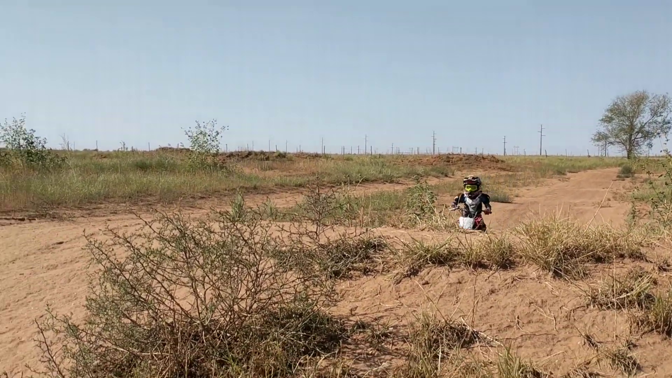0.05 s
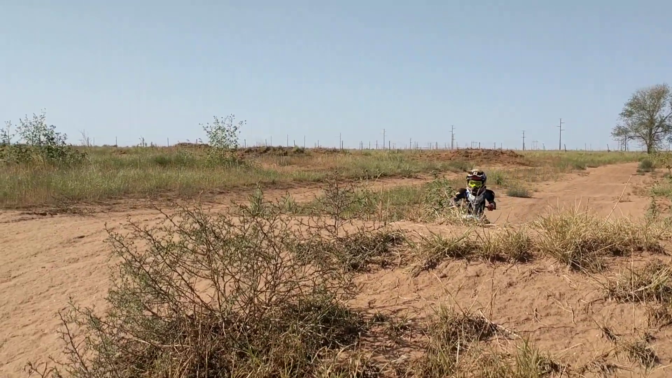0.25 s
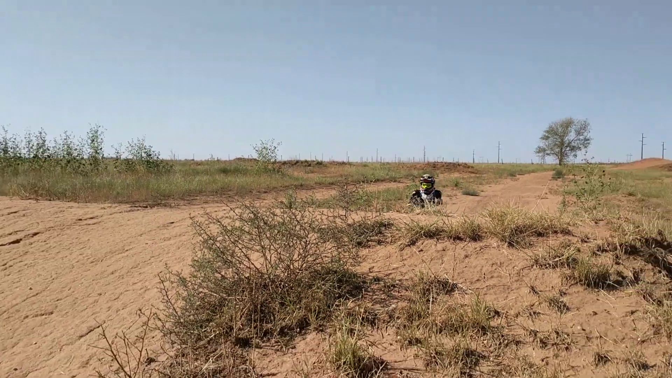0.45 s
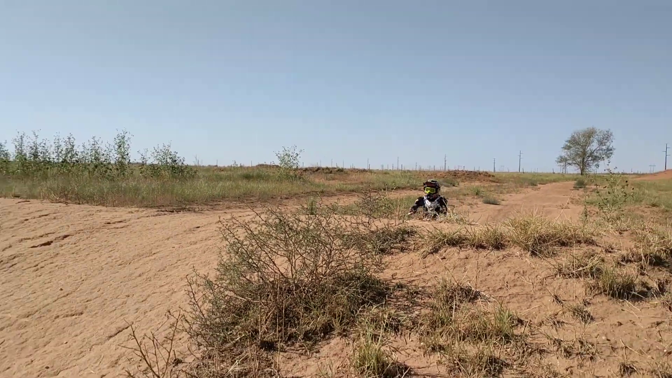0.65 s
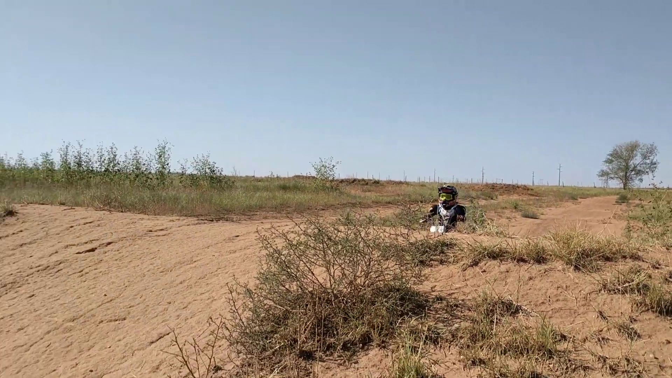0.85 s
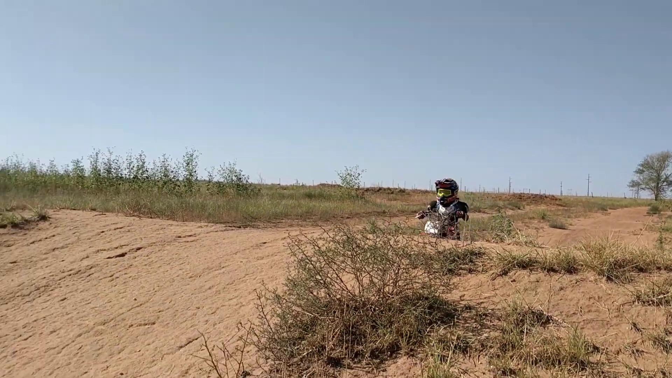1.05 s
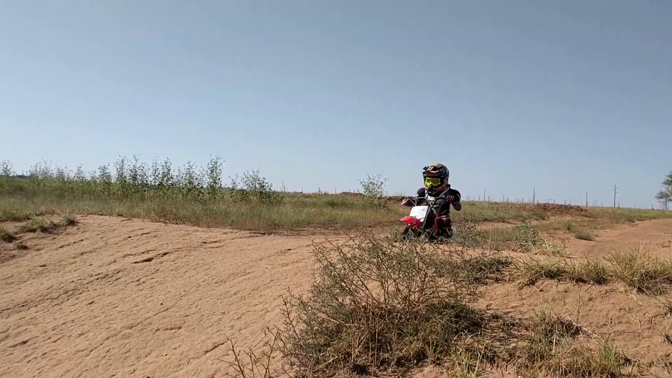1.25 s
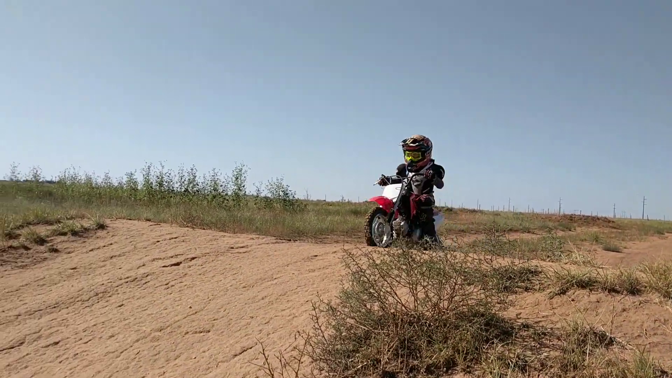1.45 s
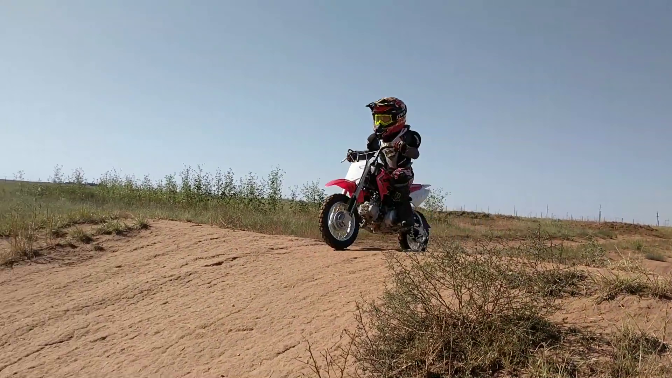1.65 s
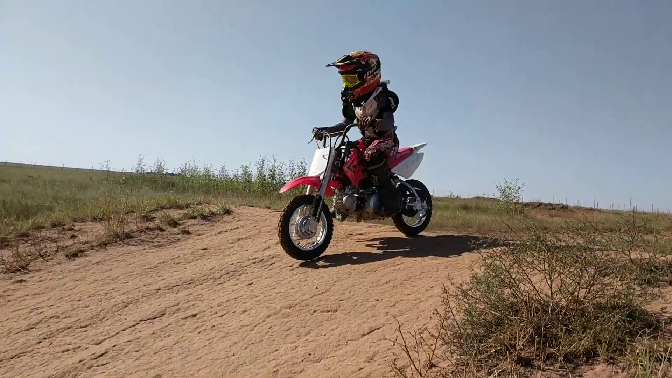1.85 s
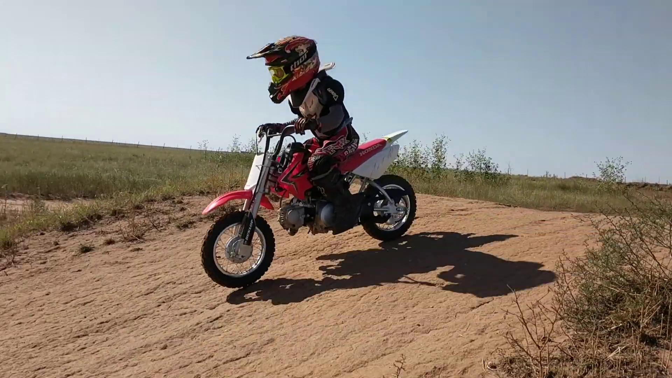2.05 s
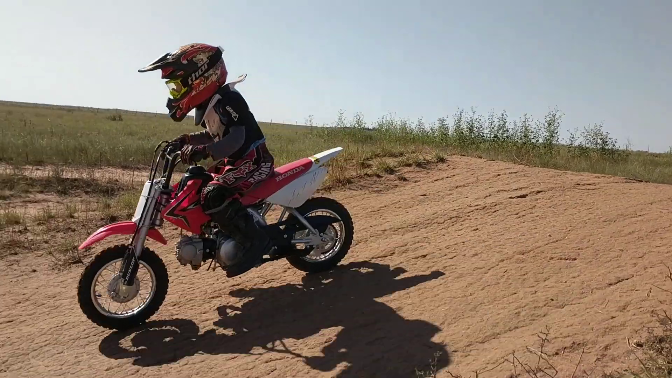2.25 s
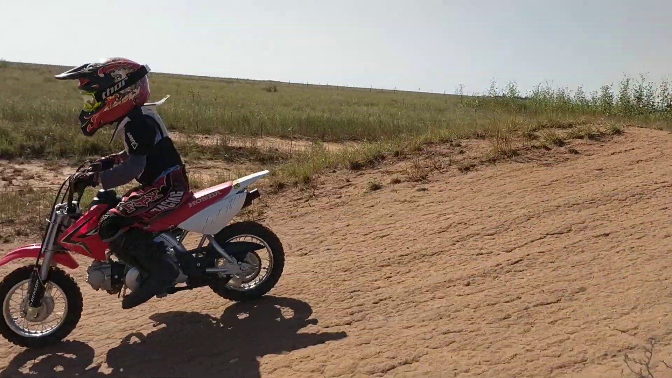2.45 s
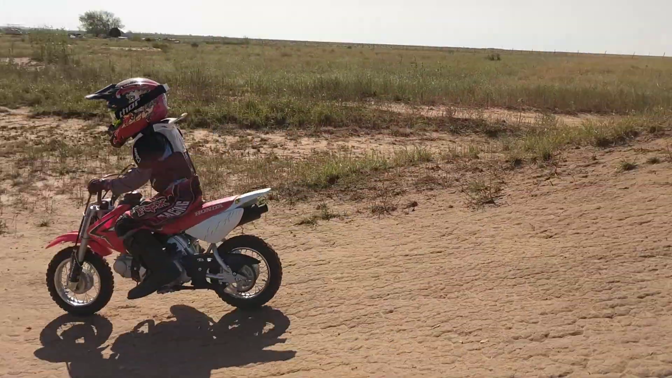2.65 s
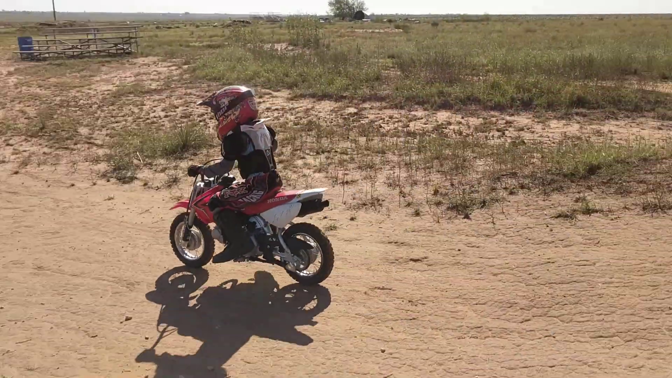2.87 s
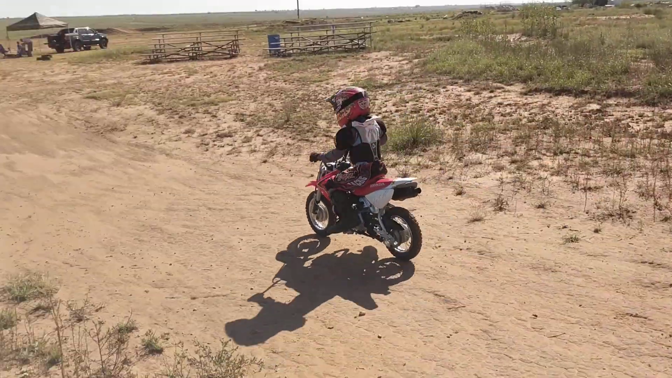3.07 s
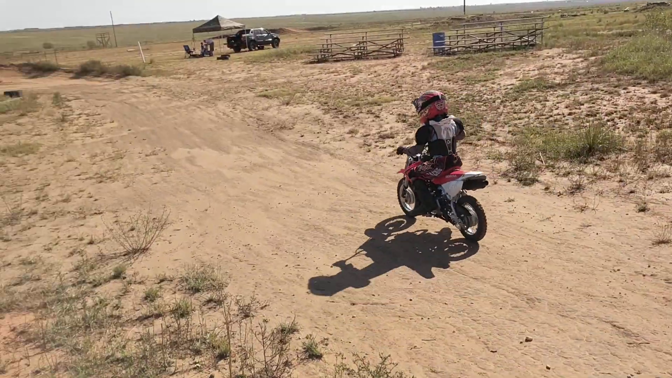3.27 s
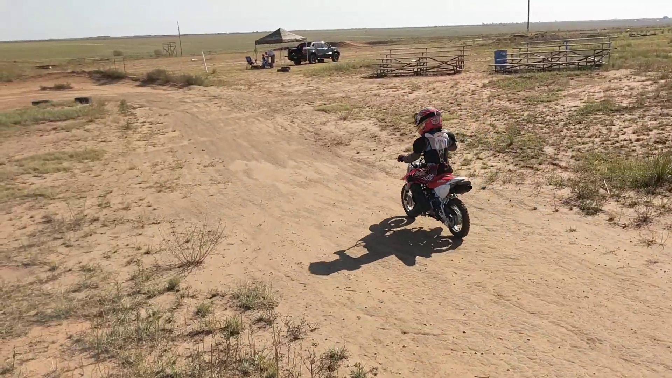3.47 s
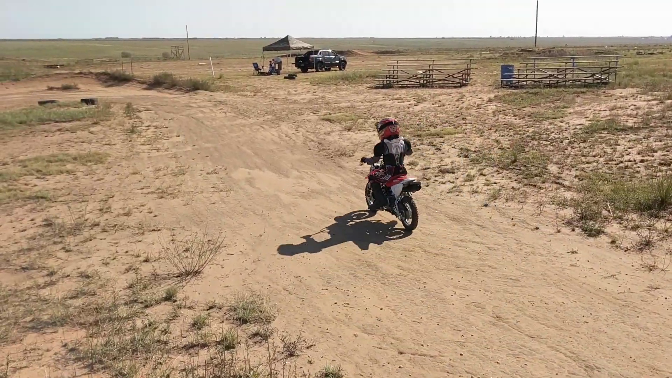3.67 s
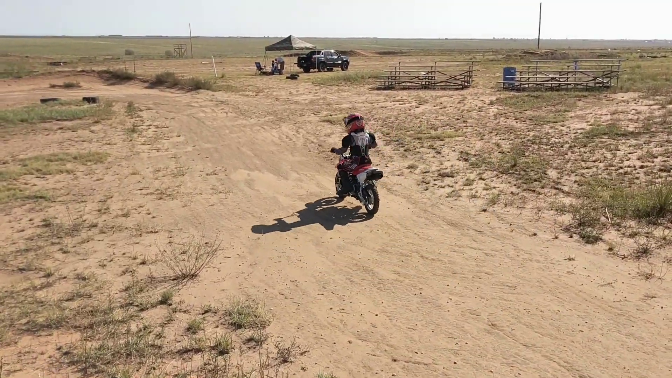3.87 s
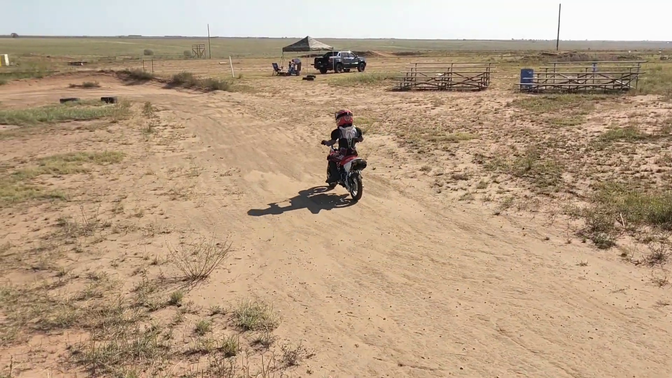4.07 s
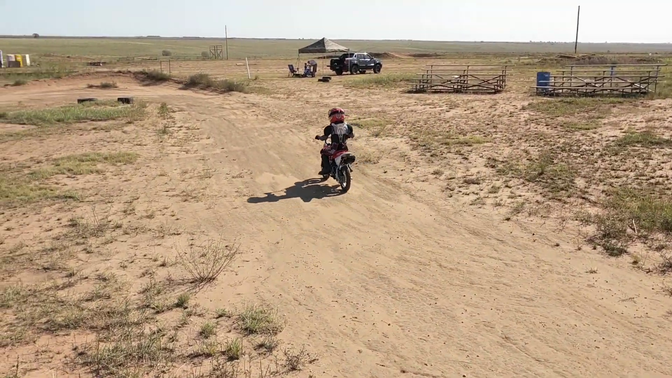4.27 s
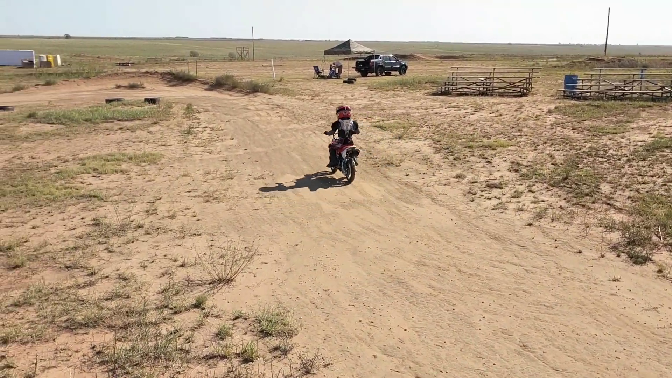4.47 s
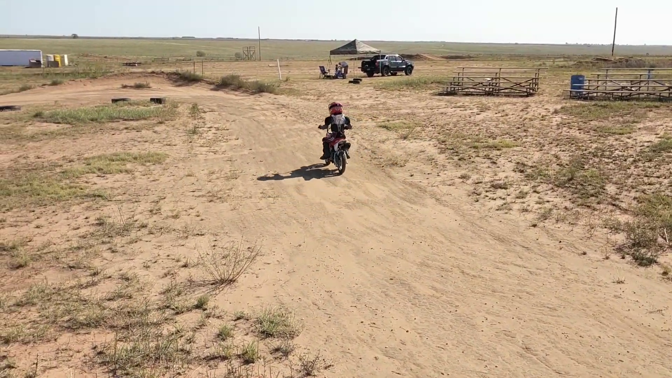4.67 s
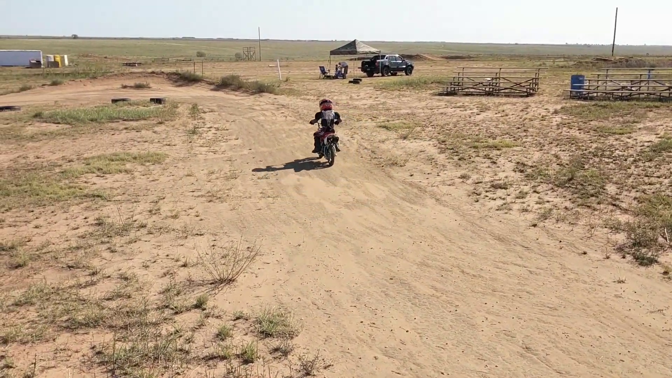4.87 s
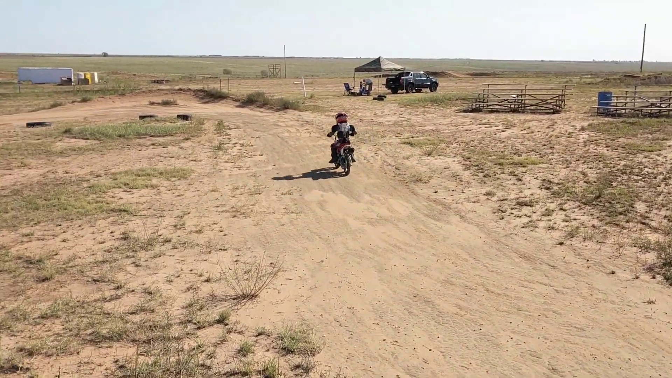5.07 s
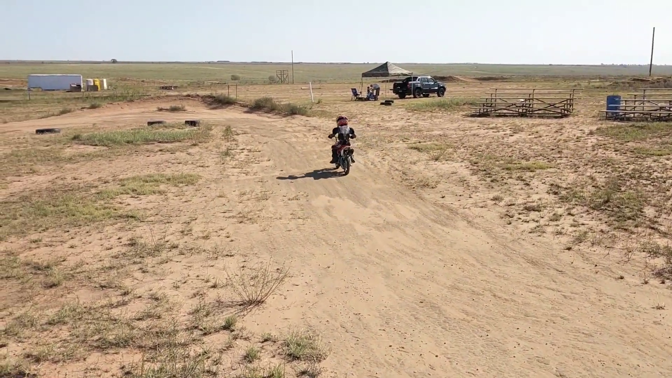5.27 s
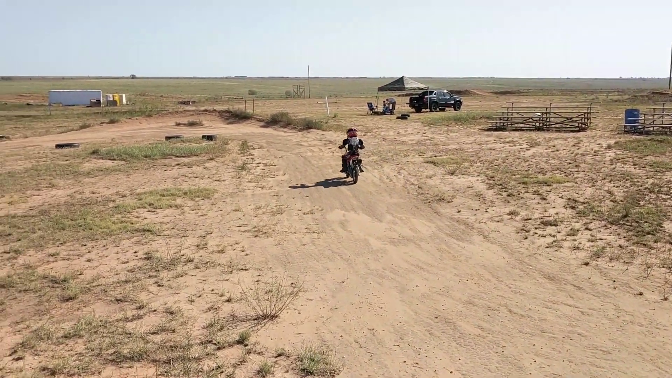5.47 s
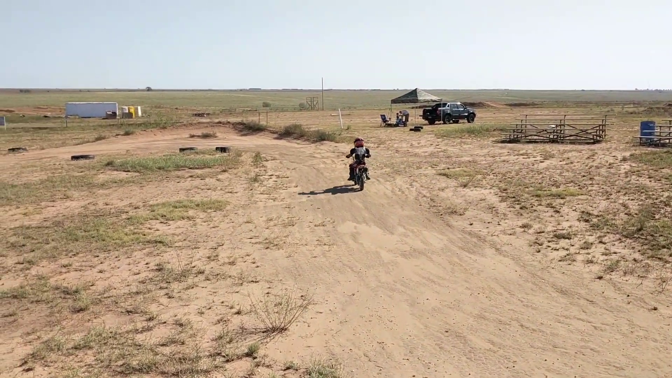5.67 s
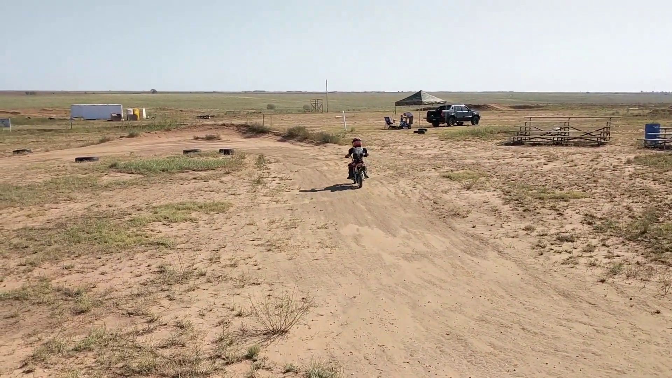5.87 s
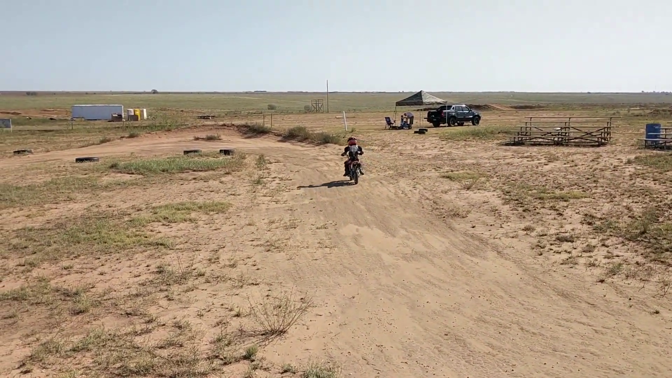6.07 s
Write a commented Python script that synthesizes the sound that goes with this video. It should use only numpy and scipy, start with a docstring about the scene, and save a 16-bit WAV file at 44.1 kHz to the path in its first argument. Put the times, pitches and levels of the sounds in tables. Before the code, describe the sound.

A small single-cylinder dirt bike putters toward the microphone in open country with no echo, under a low wind rumble. It revs briefly from about 0.1 to 0.6 seconds, eases, then pulls again from 1.1 to 2.3 seconds with a sharp, pulsing bark that grows louder. Engine clatter, gear whine, a few thin squeaks and the gritty hiss of tyres on dirt come up as it nears. The bike is loudest around 2 to 2.5 seconds, passing close as the throttle shuts. It coasts away with a softer, low putter that slows and fades, with irregular light metallic knocks from 3.5 to 5.3 seconds. A short, more distant throttle blip with bright ticks follows from 5.3 to 5.6 seconds. From about 3.3 seconds the wind buffets the microphone harder, with gusts and low pops until the end at about 6 seconds.

```python
"""Dirt bike passing in wind

A small single-cylinder four-stroke comes over a mound, passes close and rolls away on a dirt track.
Gas pulses ring the silencer: a sharp bark on open throttle, a soft boom on shut throttle.
The piston knocks the casing every cycle, valves clatter, gears whine and tyres hiss on the dirt.
Wind buffets the microphone, harder as the bike leaves."""
import sys
import numpy as np
from scipy import signal
from scipy.fft import rfft, irfft, next_fast_len
from scipy.io import wavfile
from scipy.ndimage import uniform_filter1d, map_coordinates

SR = 44100
rng = np.random.default_rng(int(sys.argv[2]) if len(sys.argv) > 2 else 0)


def unload_audio(sound):
    """Save the sound as a 16-bit wav file, at the path given as the first command line argument."""
    columns = np.transpose(np.atleast_2d(sound))
    # keep every value between -1 and 1, then stretch to whole-number steps
    steps = np.round(np.clip(columns, -1, 1) * 32767)
    wavfile.write(sys.argv[1], SR, steps.astype(np.int16))


N = 269875
T = np.arange(N) / SR

# Engine speed: t/s, firing rate/Hz
ENGINE_SPEED = [(0.0, 46.7), (0.24, 47.07), (0.37, 50.45), (0.54, 48.56), (0.66, 46.79), (0.8, 44.97),
                (1.0, 43.1), (1.25, 43.74), (1.33, 41.09), (1.52, 39.27), (1.72, 38.65), (1.87, 36.77),
                (2.2, 42.24), (2.33, 41.02), (2.46, 43.76), (2.8, 45.3), (3.3, 41.99), (3.87, 38.18),
                (4.3, 31.17), (4.93, 29.49), (5.16, 27.95), (5.5, 33.0), (5.7, 30.64), (6.12, 29.71)]
def engine_cycle():
    """Firing rate in Hz and running phase in cycles."""
    rate_hz = curves(ENGINE_SPEED)[0]
    return rate_hz, .71 + np.cumsum(rate_hz) / SR


# Throttle twists: opens/s, shuts/s, rise/s, fall/s, boom/dB, bark/dB, edge/dB
TWISTS = [(0.124, 0.587, 0.13, 0.098, -25.5, -28.5, -1.5), (1.077, 2.273, 0.34, 0.68, -22, -31, 2.5),
          (5.287, 5.62, 0.087, 0.045, -18, -32, -19)]
def firings():
    """Firing times in s, one per cycle, and the throttle (0 shut, 1 open)."""
    _, cycles = engine_cycle()
    times = np.interp(np.arange(1, int(cycles[-1]) + 1), cycles, T)
    held = sum(1.0 * ((T > opens) & (T < shuts)) for opens, shuts, *_ in TWISTS)
    return times, uniform_filter1d(held, size=600)


def load():
    """Boom, bark and edge in dB: each twist rises, holds, eases, then floats, neither pushing nor sucking."""
    float_s, float_db = 0.046, 7.5
    rows = []
    for opens, shuts, rise, fall, *full_db in TWISTS:
        eased_db = np.subtract(full_db, [3.5, 4, 22.5])
        floating_db = eased_db - [float_db, float_db, 0]
        rows += [(opens, *eased_db), (opens + rise, *full_db), (shuts - fall, *full_db),
                 (shuts - float_s, *eased_db), (shuts, *floating_db)]
    return curves(sorted(rows))


def silencer(kicks, share, spectrum, band):
    """One band of the silencer rung by gas pulses; rms 1 at full share."""
    full_rms = np.std(filtered(ring(kicks, spectrum), band))
    return filtered(ring(kicks * share, spectrum), band) / full_rms


# Pulse spectra (loaded, coasting, leaking forward with a hollow pipe note): f/Hz, level/dB
LOADED_SPECTRUM = [(30, -35.5), (78, -5.5), (115, -7), (155, -6.5), (192, 5.5), (240, -12.5), (340, -2),
                   (440, -4), (500, -14.5), (615, -2.5), (690, -13), (760, -9), (850, -18.5), (1060, -14),
                   (1280, -34), (1450, -14.5), (1700, -36), (2050, -23.5), (2800, -54.5), (6000, -108)]
COAST_SPECTRUM = [(30, -39.5), (88, -29), (132, 2.5), (172, 6.5), (220, -9), (300, -15), (375, -13.5),
                  (450, -29.5), (560, -38), (720, -43.5), (900, -55.5), (2000, -93.5)]
LEAK_SPECTRUM = [(30, -36), (200, -5), (340, -3), (430, -9.5), (510, -6.5), (578, -1), (640, -14.5),
                 (750, -6.5), (850, -23.5), (1060, -19.5), (1250, -22.5), (1450, -22), (1900, -28),
                 (3000, -75), (6000, -108)]
# Stumbles: t/s, length/s, gain/dB
WEAK_FIRINGS = [(0.18, .03, -9), (0.845, .03, -8), (0.942, .036, -11), (1.19, .03, -8)]
def exhaust(times, throttle):
    """Gas pulses ring the silencer: a steep push under load, a round suck when coasting."""
    near_db, heading = ride()
    boom_db, bark_db, edge_db = load()
    shut = 1 - throttle
    bass, treble = lowpass(244, 8), highpass(244, 8)
    vigour = amp(swells(WEAK_FIRINGS))
    sucks = -vigour * beats(times - .0013, scatter_db=1.1, jitter_s=.00013)
    pushes = vigour * beats(times - .0003, scatter_db=.8, jitter_s=.00002)
    starved = vigour * beats(times - .0003, scatter_db=3, jitter_s=.0001)

    overrun_db = 6 * sum((T > shuts) * np.exp(-np.abs(T - shuts) / 0.024) for _, shuts, *_ in TWISTS)
    boom = amp(-21.5 + overrun_db) * silencer(sucks, shut, COAST_SPECTRUM, bass)
    boom += amp(boom_db) * silencer(pushes, throttle, LOADED_SPECTRUM, bass)

    leak = 0.084 + 0.29 * np.maximum(heading, 0)
    putter = silencer(sucks, shut, COAST_SPECTRUM, treble)
    putter += silencer(starved, leak * shut, LEAK_SPECTRUM, treble)

    hot = 1.0 * (engine_cycle()[0] > 41.5)  # hotter gas at speed rings higher
    hot_spectrum = [(hz * 1.057, db) for hz, db in LOADED_SPECTRUM]
    bark = silencer(pushes, throttle * (1 - hot), LOADED_SPECTRUM, treble)
    bark += silencer(pushes, throttle * hot, hot_spectrum, treble)
    bark += amp(-1.5) * gas_rush(pushes * throttle)
    bark += (amp(edge_db) - 1) * filtered(bark, highpass(740, 8))  # more load, steeper pulse
    return amp(near_db) * (boom + amp(bark_db) * bark + amp(-35.5 + 6.5 * heading) * putter)


def gas_rush(pushes):
    """Gas rushes out behind each loaded pulse."""
    spectrum = colour([(300, -1), (700, 2.5), (1150, -1.0), (2500, -10.5), (4000, -24), (16000, -57)])
    return filtered(noise() * bursts(pushes, attack_s=0.00062, decay_s=0.025), spectrum)


def ride():
    """Spreading loss in dB (0 when closest) and heading (1 coming, -1 leaving)."""
    pass_s, speed_m_per_s, closest_m = 2.506, 3.38, 2.354
    to_go_m = speed_m_per_s * (pass_s - T)
    distance_m = np.hypot(to_go_m, closest_m)
    return 20 * np.log10(closest_m / distance_m), to_go_m / distance_m


def engine_hidden():
    """1 while the mound screens the engine, then 0."""
    return 1.0 * (T <= 1.23)


def mechanics(times, throttle):
    """Piston and valves strike once a cycle over the whirr of the drive; under load they trail the bark."""
    _, heading = ride()
    whirr = amp(2.5 + 4.5 * heading - 3 * np.maximum(-heading, 0))
    hits_s = times - .0017 + 0.00442 * np.interp(times, T, throttle)
    return piston_slap(hits_s, throttle, whirr) + valve_clatter(hits_s, whirr)


# Casing modes, coasting and loaded: f/Hz, width/Hz, level/dB
CASING_MODES = [(1327, 100, -12), (1512, 88, 7.5), (1587, 130, -1), (2110, 180, -19), (2500, 160, -14),
                (3120, 68, -28)]
LOADED_MODES = [(1420, 91, 6.5), (1560, 185, 2.5), (1970, 430, -7.5), (2540, 150, -8.5), (3170, 240, -13.5)]
# Casing ring: t/s, level/dB
SLAP_LEVEL = [(0.0, -53), (0.34, -59), (0.71, -56.5), (1.05, -49), (1.09, -57), (1.28, -50.5),
              (1.45, -49.5), (1.66, -39), (1.8, -43.5), (2.0, -42), (2.14, -33.5), (2.28, -50),
              (2.37, -36.5), (3.0, -45.5), (3.83, -40.5), (4.14, -53), (4.5, -58.5), (5.45, -71),
              (6.12, -64)]
# Random drift of that level: firing rate/Hz, signed depth/dB
SLAP_DRIFT = [(30, -2), (40, 1.87)]
def piston_slap(hits_s, throttle, whirr):
    """The piston rings the casing cleanly; loose parts chatter after it."""
    def casing(force):
        return levelled(shaken(force * (1 - throttle), CASING_MODES) + shaken(force * throttle, LOADED_MODES))

    slaps = beats(hits_s + 0.00056, scatter_db=1.5, jitter_s=0.00014)
    chatter = noise() * (bursts(slaps, attack_s=0.0043, decay_s=0.0028) + 0.17 * whirr)
    knock = levelled(casing(slaps) + (.4 + .4 * whirr) * casing(chatter))
    drift_db = np.interp(engine_cycle()[0], *np.transpose(SLAP_DRIFT)) * wobble(11)
    return amp(curves(SLAP_LEVEL)[0] + drift_db) * knock


# Valve noise: f/Hz, level/dB
VALVE_SPECTRUM = [(300, 9.5), (600, -3), (850, -5), (1150, 3), (1850, 2.5), (2400, -0.5), (2800, 0.5),
                  (3200, -2.5), (3700, -7), (4300, -12.5), (6000, -8), (7200, -16), (8200, -10.5),
                  (11000, -18.5), (17000, -67)]
def valve_clatter(hits_s, whirr):
    """Valve taps are short noise bursts over the steady whirr of chain and gears."""
    near_db, _ = ride()
    taps = beats(hits_s, scatter_db=5.5, jitter_s=0.00031)
    envelope = bursts(taps, attack_s=0.0014, decay_s=0.0035) + whirr
    clatter = levelled(filtered(noise() * envelope, colour(VALVE_SPECTRUM)))
    lash_db = 4 * swell(2.32, 0.06)  # the slack chain rattles once, on a throttle snap
    return amp(-38.5 + 1.4 * near_db - 6 * engine_hidden() + lash_db) * clatter


# Hard knocks: t/s, ping/dB, clank/dB
HARD_KNOCKS = [(3.544, -27, -42), (3.569, -35, -38), (3.72, -40, -51), (3.768, -29, -64), (3.824, -34, -53),
               (3.849, -33, -52), (3.874, -29, -41), (3.984, -34, -41.5), (4.124, -35, -49),
               (4.339, -34, -60), (4.371, -33, -45), (4.403, -38, -49), (4.437, -35, -53),
               (4.501, -33.5, -61), (4.569, -39, -63), (4.668, -34, -58), (4.701, -37, -55),
               (4.769, -36, -62), (4.902, -37, -52), (4.938, -38, -51), (5.006, -40.5, -54),
               (5.075, -44, -55), (5.11, -40, -45), (5.142, -40, -52), (5.179, -42, -46),
               (5.251, -36.5, -47.5), (5.793, -59, -49), (5.892, -55, -50.5), (5.926, -55, -53.5),
               (5.991, -52.5, -48)]
# Clank of loose parts: f/Hz, width/Hz, level/dB
CLANK_MODES = [(1740, 120, 6.5), (2406, 220, 11.5), (2690, 180, 9), (3850, 250, -1), (4400, 360, -3)]
def knocks():
    """As the engine slows, single cycles knock hard: a casing ping and a soft clank of loose parts."""
    times, _, clank_db = np.transpose(HARD_KNOCKS)
    rattle = bursts(impulses(times, amp(clank_db)), attack_s=0.00099, decay_s=0.0042)
    clank = struck(rattle, lambda hz: resonances(CLANK_MODES)(hz) * lowpass(5500, 4)(hz))
    return clank + sum(blow(at + 0.00104, db, CASING_MODES, attack_s=0.0017) for at, db, _ in HARD_KNOCKS)


# Ticks under load at low speed: t/s, relative crack/dB, ping/Hz, relative clank/dB
LOAD_TICKS = [(5.281, -37, 9600, -45), (5.3153, -28.5, 8100, -39), (5.349, -30.5, 8200, -32),
              (5.381, -28, 8300, -30.5), (5.4122, -26, 9600, -34), (5.4424, -23, 9530, -31.5),
              (5.4722, -30.5, 8140, -34.5), (5.5034, -24.5, 10100, -30.5), (5.535, -29, 10000, -32),
              (5.566, -38, 10400, -35.5), (5.598, -43, 8350, -51)]
# The crack, and the clear note in the clank: f/Hz, width/Hz, level/dB
CRACK_MODES = [(8400, 600, 2), (9950, 810, 2), (13400, 1500, 1)]
NOTE_MODES = [(2870, 90, -4), (1646, 110, -4.5), (4800, 220, -8)]
# Trailing rasp: f/Hz, level/dB
RASP_SPECTRUM = [(500, -4), (1200, 5), (1800, 5.5), (3000, -1), (3500, -5), (4600, -2), (6500, -12),
                 (8500, -6), (12000, -22), (17000, -31)]
def ticks():
    """Metal ticks: a bright ping and crack, then a lower ringing clank that trails off in a rasp."""
    times, crack_db, _, clank_db = np.transpose(LOAD_TICKS)
    pings = sum(blow(at, db, [(hz, 380, 0), (13350, 460, 1)], attack_s=0.00058)
                for at, db, hz, _ in LOAD_TICKS)
    notes = sum(blow(at + .0006, db, NOTE_MODES, attack_s=.0007) for at, _, _, db in LOAD_TICKS)
    cracks, clanks = impulses(times, amp(crack_db)), impulses(times, amp(clank_db))
    rasp = unit(filtered(noise(), colour(RASP_SPECTRUM))) * bursts(clanks, attack_s=0.001, decay_s=0.018)
    snap = bursts(cracks, attack_s=0.0002, decay_s=0.00096)
    tail = 0.05 * bursts(cracks, attack_s=0.00069, decay_s=0.007)
    crack = struck(snap + tail, resonances(CRACK_MODES))
    clank = struck(bursts(clanks, attack_s=0.0006, decay_s=0.0034), resonances(CLANK_MODES))
    mix = amp(-2) * (pings + notes) + amp(-9.5) * crack + amp(-7) * clank + amp(-17.5) * rasp
    return filtered(mix, lowpass(16000, 24))


# Gear tones: multiple of firing rate, level/dB, side-on gain/dB, rear gain/dB
GEAR_ORDERS = [(16.23, -11.5, 15.5, -8), (30.03, -4.5, 10.5, -1.5), (58, -4, -4, 5.5), (92.5, -12, -12, 10)]
def gear_whine():
    """Gear teeth sing louder with speed and are loaded hardest at each firing."""
    rate_hz, cycles = engine_cycle()
    near_db, heading = ride()
    throb = 1 + 0.41 * np.cos(2 * np.pi * cycles)
    level_db = -48 + 1.51 * near_db + 35 * np.log10(rate_hz / rate_hz.max()) - 7.5 * engine_hidden()
    side_on, behind = swell(3.02, 0.72), np.maximum(-heading, 0)
    tones = sum(amp(db + side_db * side_on + rear_db * behind) * narrowband(order * rate_hz, width_hz=60)
                for order, db, side_db, rear_db in GEAR_ORDERS)
    return amp(level_db) * throb * tones


# Squeaks: centre/s, length/s, f/Hz, level/dB
CHASSIS_SQUEAKS = [(1.52, 0.018, 11100, -51), (1.809, 0.013, 11360, -43.5), (1.88, 0.022, 8250, -54),
                   (2.17, 0.11, 1464, -44), (2.207, 0.11, 3100, -45), (2.206, 0.046, 8670, -48),
                   (2.766, 0.044, 2480, -40), (4.35, 0.37, 8040, -72)]
def squeaks():
    """Chain and chassis squeak thinly over the bumps."""
    return sum(amp(db) * swell(at, length_s) * narrowband(hz, width_hz=8 * np.sqrt(hz))
               for at, length_s, hz, db in CHASSIS_SQUEAKS)


# Chain ring: f/Hz, width/Hz, level/dB
CHAIN_MODES = [(8630, 600, 0), (9600, 920, 0)]
def chain_sizzle():
    """The chain sizzles as it pulls over the mound."""
    sizzle = unit(filtered(noise() * amp(5.3 * wobble(150)), resonances(CHAIN_MODES)))
    return amp(-53) * swell(1.99, 0.89) * sizzle


def timing_chain():
    """The timing chain whirrs in step with the engine, heard from ahead."""
    near_db, heading = ride()
    whirr = narrowband(71 * engine_cycle()[0], width_hz=330)
    return amp(-61.5 + 1.34 * near_db) * np.maximum(heading, 0) * whirr


def grit(count):
    """Each flung grain is a tiny high ping."""
    when, pitch, force = rng.random((count, 3)).T
    t = T[:SR // 80]
    hz, gain = 6500 + 9500 * pitch[:, None], amp(-1.5 + 14 * force[:, None] ** 3)
    pings = gain * np.sin(2 * np.pi * hz * t) * np.exp(-t / 0.0028)
    samples = (when * (N - len(t))).astype(int)[:, None] + np.arange(len(t))
    return np.bincount(samples.ravel(), pings.ravel(), N)


# Crushed dirt: f/Hz, level/dB
DIRT_SPECTRUM = [(1500, -6), (4000, 9), (7000, 5.5), (9500, 4), (12000, 2.5), (14000, 4.5), (17000, 0)]
def tyres():
    """Knobbly tyres crush the dirt: a grainy hiss, its top screened by the mound and from ahead."""
    crunch = noise() * amp(3.8 * wobble(500) + 1.8 * wobble(40))
    hiss = unit(unit(filtered(crunch, colour(DIRT_SPECTRUM))) + grit(count=160))
    screened = filtered(hiss, lowpass(10000, 10))
    near_db, heading = ride()
    hidden = np.interp(T, [1.34, 1.36], [1, 0])
    dull = np.maximum(hidden, 0.6 * heading)
    return amp(-46 + 1.65 * near_db - 19 * hidden) * ((1 - dull) * hiss + dull * screened)


# Breeze: t/s, level/dB
BREEZE_LEVEL = [(0, -30), (1.35, -30.5), (1.55, -39), (2.0, -48), (2.15, -27), (3.3, -26), (4.4, -26),
                (5.5, -25), (6.12, -24.5)]
# Gusts and lulls: centre/s, length/s, gain/dB
GUST_SWELLS = [(0.2, 0.1, 11.5), (0.384, 0.26, 6), (1.004, .08, -7), (1.183, 0.053, 10), (2.513, 0.038, 6),
               (3.372, 0.046, 10.5), (3.737, 0.048, 8), (3.89, 0.031, 4), (4.29, 0.13, -3.5),
               (4.41, 0.018, 6.5), (4.511, 0.021, 7.5), (4.655, 0.17, 3.5), (4.805, 0.058, 2.5),
               (4.908, 0.059, -6.5), (5.296, 0.08, -5), (5.4, 0.042, 4), (5.647, 0.08, 1.5),
               (5.858, .05, 4), (6.008, 0.045, 5)]
# Turbulence: f/Hz, level/dB
RUMBLE_SPECTRUM = [(20, -61), (32, -34), (48, -4), (75, 1.5), (110, 1), (165, -5.5), (230, -11),
                   (330, -22.5), (480, -28.5), (800, -45), (2000, -104)]
def wind():
    """Turbulence rumbles on the microphone; small eddies add flurries that grow with the gusts."""
    gust_db = swells(GUST_SWELLS) + 1.7 * wobble(14)
    rumble = levelled(filtered(noise(), colour(RUMBLE_SPECTRUM)), window=SR // 10)
    deep = filtered(rumble, lowpass(110, 8))
    flurry_db = -4 + 0.36 * gust_db + 5.4 * wobble(30)
    rumble += (amp(flurry_db) - 1) * filtered(rumble, highpass(330, 6))
    exposure = np.interp(T, [3.1, 3.7], [.25, 1])  # fuller as the microphone turns into the wind
    return amp(curves(BREEZE_LEVEL)[0] + gust_db) * (deep + exposure * (rumble - deep))


# Strong eddies: t/s, relative level/dB
EDDIES = [(0.828, -37), (2.554, -42), (3.371, -30.5), (3.49, -46), (3.596, -34.5), (3.745, -49),
          (4.041, -36.5), (4.172, -33), (4.177, -31.5), (4.413, -51), (4.509, -46), (4.779, -28.5),
          (4.801, -31), (4.827, -28.5), (4.833, -34), (5.653, -34), (5.692, -37), (5.924, -38.5),
          (5.969, -32), (6.025, -33.5)]
def wind_pops():
    """An eddy is a brief push of air and a slower suck of equal volume; each sheds three weaker ones."""
    times, db = np.transpose(EDDIES)
    t = T[:SR // 20]
    push, suck = [u ** 2 * np.exp(-u) for u in (t / 0.00041, t / 0.0021)]
    eddy = push - suck * push.sum() / suck.sum()
    delays_s = rng.uniform(0.00097, 0.013, (len(times), 3)).T
    shed = sum(impulses(times + delay, amp(db - 13)) for delay in delays_s)
    pops = amp(16.5) * signal.fftconvolve(impulses(times, amp(db)) + shed, eddy / eddy.max())[:N]
    return filtered(pops, lambda hz: lowpass(1550, 6)(hz) * highpass(45, 4)(hz))


def amp(db):
    """Decibels to gain."""
    return 10 ** (np.asarray(db) / 20)


def unit(x):
    """x at rms 1."""
    return x / np.sqrt(np.mean(x ** 2) + 1e-20)


def levelled(x, window=SR // 6):
    """x at a running rms of 1; window in samples."""
    return x / np.sqrt(np.abs(uniform_filter1d(x ** 2, size=window)) + 1e-12)


def curves(rows):
    """One value per sample for each column after the time."""
    times, *columns = np.transpose(rows)
    return [np.interp(T, times, column) for column in columns]


def swell(centre_s, length_s):
    """A bell-shaped rise and fall."""
    return np.exp(-(2 * (T - centre_s) / length_s) ** 2)


def swells(rows):
    """Summed bells, in dB."""
    return sum(db * swell(centre_s, length_s) for centre_s, length_s, db in rows)


def noise():
    """Fresh white noise."""
    return rng.standard_normal(N)


def wobble(rate_hz):
    """A smooth random curve with knots at rate_hz."""
    coarse = T[::8]
    knots = rng.standard_normal(int(N * rate_hz / SR) + 4)
    return np.interp(T, coarse, map_coordinates(knots, [coarse * rate_hz]))


def narrowband(hz, width_hz):
    """A fuzzy tone of rms 1 at a fixed or moving frequency."""
    carrier = np.exp(2j * np.pi * np.cumsum(np.broadcast_to(hz, N)) / SR)
    return unit(((wobble(width_hz) + 1j * wobble(width_hz)) * carrier).real)


def lowpass(corner_hz, order):
    """Gain against frequency, one half at the corner."""
    return lambda hz: 1 / (1 + (hz / corner_hz) ** order)


def highpass(corner_hz, order):
    """Complement of the lowpass."""
    return lambda hz: 1 - lowpass(corner_hz, order)(hz)


def colour(points):
    """Gain against frequency from (Hz, dB) points on a log axis."""
    f, db = np.transpose(points)
    return lambda hz: amp(np.interp(np.log(hz + 1), np.log(f), db))


def resonances(modes):
    """Causal response of (Hz, width Hz, dB) modes."""
    return lambda f: sum(amp(db) * 1j * f * width / (hz * hz - f * f + 1j * f * width)
                         for hz, width, db in modes)


def filtered(x, response):
    """x through a frequency response."""
    size = next_fast_len(N + SR // 2)
    return irfft(rfft(x, size) * response(np.fft.rfftfreq(size, 1 / SR)), size)[:N]


def ring(x, spectrum):
    """x through a minimum-phase body with the given spectrum."""
    size = 8192
    cepstrum = irfft(np.log(colour(spectrum)(np.fft.rfftfreq(size, 1 / SR))))
    cepstrum[1:size // 2] *= 2
    cepstrum[size // 2 + 1:] = 0
    return signal.fftconvolve(x, irfft(np.exp(rfft(cepstrum))))[:N]


def impulses(times, sizes):
    """Single-sample kicks at the given times."""
    inside = (times >= 0) & (times < T[-1])
    return np.bincount((times[inside] * SR).astype(int), sizes[inside], N)


def beats(times, scatter_db, jitter_s):
    """One kick per cycle, each a little off in size and time."""
    size, slip = rng.standard_normal((len(times), 2)).T
    return impulses(times + jitter_s * slip, amp(scatter_db * size))


def bursts(kicks, attack_s, decay_s):
    """An envelope that jumps to about each kick's size and dies away."""
    t = T[:SR // 8]
    shape = (1 - np.exp(-t / attack_s)) * np.exp(-t / decay_s)
    return signal.fftconvolve(kicks, shape / shape.max())[:N]


def struck(envelope, response):
    """Noise bursts ring a body; rms 1 for a steady envelope of 1."""
    return filtered(noise() * envelope, response) / np.std(filtered(noise(), response))


def blow(at_s, peak_db, modes, attack_s):
    """One blow; each mode rings a little differently every time."""
    t = T[:SR // 30]
    hz, width, db = np.transpose(modes)[:, :, None]
    size, detune = rng.standard_normal((2, len(modes), 1))
    decays = amp(db + 1.8 * size) * np.exp(-np.pi * width * t)
    partials = decays * np.sin(2 * np.pi * (hz + 0.12 * width * detune) * t)
    tone = partials.sum(axis=0) * (1 - np.exp(-t / attack_s))
    out = np.zeros(N + len(t))
    out[int(at_s * SR):][:len(t)] = amp(peak_db) * tone / np.abs(tone).max()
    return out[:N]


def shaken(x, modes):
    """x rings the modes, and their balance shifts from cycle to cycle."""
    t = T[:SR // 40]
    out = np.zeros(N)
    for k, (hz, width, db) in enumerate(modes):
        mode = (-1) ** k * width * np.exp(-np.pi * width * t) * np.sin(2 * np.pi * hz * t)
        out += signal.oaconvolve(x * amp(db + 2.5 * wobble(30)), mode)[:N]
    return out


def scene():
    """Bike, wind and a faint steady hiss in open country, with no echo."""
    times, throttle = firings()
    engine = exhaust(times, throttle) + mechanics(times, throttle) + knocks()
    drive = gear_whine() + squeaks() + chain_sizzle() + timing_chain()
    bike = engine + drive + ticks() + tyres()
    return (bike + wind() + wind_pops() + amp(-77) * noise())[None]


def record(dry):
    """Brick-wall band limit."""
    top_hz = 17100
    return np.array([filtered(x, lambda hz: hz < top_hz) for x in dry])


dry = scene()
out = record(dry)
unload_audio(out)
```